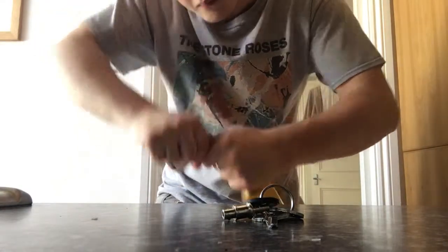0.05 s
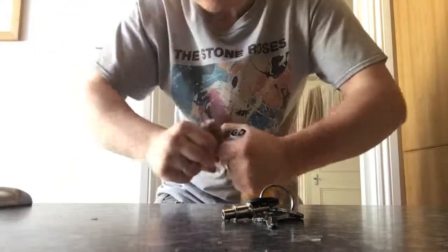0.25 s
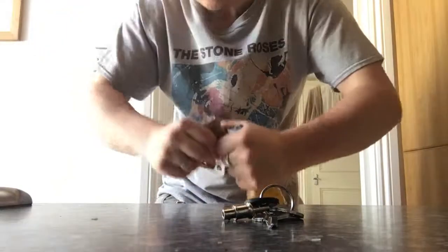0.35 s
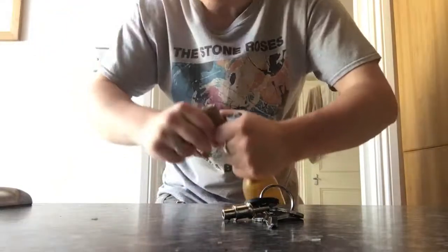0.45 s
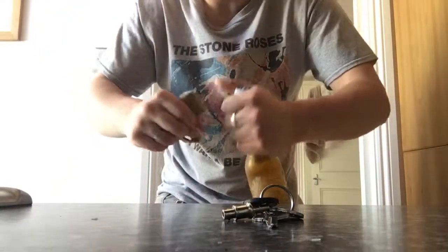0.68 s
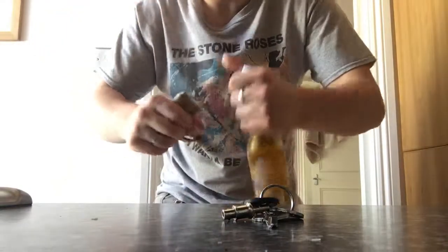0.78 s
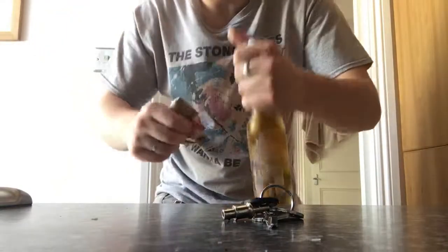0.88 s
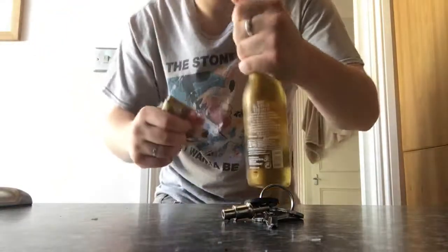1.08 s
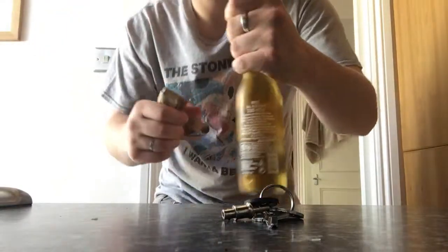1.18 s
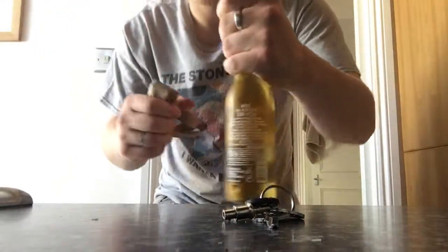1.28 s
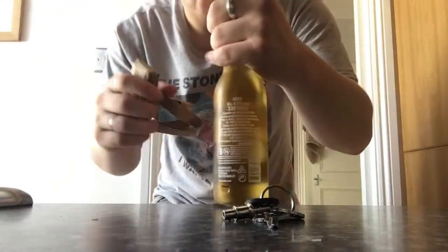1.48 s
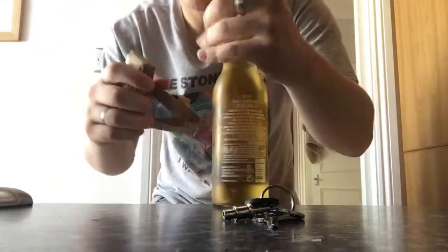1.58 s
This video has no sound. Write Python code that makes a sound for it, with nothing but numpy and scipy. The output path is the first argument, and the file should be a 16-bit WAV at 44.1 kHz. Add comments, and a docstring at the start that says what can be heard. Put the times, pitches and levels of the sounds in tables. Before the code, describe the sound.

Close to the microphone in a small room, a bottle pops open sharply after a tick and faint hand rustle. The loose cap ticks, the drink fizzes faintly, and the bottle is set down with a knock and short slide.

```python
"""A small kitchen, one microphone close to a glass bottle. Over room air and mains hum, hands rustle and
an opener bites a crown cap. Gas spurts, the cap cracks free and the air in the neck rings with a loud
hollow pop that returns from the walls. Light metal ticks and a faint fizz follow. At 1.1 s the background
drops away; then the bottle knocks on the countertop, rocks and slides a little."""
import sys
import numpy as np
from scipy import signal
from scipy.fft import rfft, irfft
from scipy.io import wavfile

SR = 44100
rng = np.random.default_rng(int(sys.argv[2]) if len(sys.argv) > 2 else 0)


def to_wav(s):
    """Save 16-bit WAV."""
    ch = np.atleast_2d(s).T  # columns
    pcm = np.round(np.clip(ch, -1, 1) * 32767)  # PCM
    wavfile.write(sys.argv[1], SR, pcm.astype(np.int16))


N = 72765
T = np.arange(N) / SR
NECK_S = .2381  # the air in the neck starts to ring
# glass touching the counter, in knock and slide: (frequency [Hz], level [dB])
CLINK_COLOUR = [(300, -2.5), (1700, 8.5), (3000, 2), (4800, -2), (5900, 2.5), (7500, -12.5), (11000, -9.5),
                (16000, -24)]


def undb(db):
    """Decibels to gain."""
    return 10 ** (np.asarray(db) / 20)


def unit(x):
    """Scale to rms 1."""
    return x / np.sqrt(np.mean(x ** 2))


def over_hz(points, hz):
    """Read (frequency [Hz], value) points on a log-frequency axis."""
    f, v = np.array(points, float).T
    return np.interp(np.log(np.maximum(hz, 1)), np.log(f), v)


def curve(points):
    """Gain from (time [s], level [dB]) points; silent before the first."""
    s, db = np.array(points, float).T
    return undb(np.interp(T, s, db)) * (T >= s[0])


def fade(start, decay):
    """Sudden start, exponential fall."""
    return (T >= start) * np.exp(-np.maximum(T - start, 0) / decay)


def noise(colour):
    """Noise of rms 1 with the given spectrum."""
    gain = undb(over_hz(colour, np.arange(N // 2 + 1) * SR / N))
    return unit(irfft(rfft(rng.standard_normal(N)) * gain, N))


def coloured(x, colour):
    """Causal filter of unit power with the given spectrum."""
    gain = unit(undb(over_hz(colour, np.arange(N + 1) * SR / (2 * N))))
    cepstrum = irfft(np.log(gain))[:N]
    minimum_phase = np.exp(2 * rfft(cepstrum, 2 * N) - cepstrum[0])
    return irfft(rfft(x, 2 * N) * minimum_phase)[:N]


def burst(colour, envelope):
    """Noise shaped by an envelope, then coloured."""
    return coloured(rng.standard_normal(N) * envelope, colour)


def resonate(x, hz, width, passes=1):
    """One resonance, gain 1 at its centre; each further pass narrows it."""
    for _ in range(passes):
        x = signal.lfilter(*signal.iirpeak(hz, hz / width, fs=SR), x)
    return x


def ring(modes, start):
    """Struck modes of alternating sign."""
    return sum((-1) ** k * undb(db) * np.sin(2 * np.pi * hz * (T - start))
               * fade(start, t60 / np.log(1000)) for k, (hz, db, t60) in enumerate(modes))


def kitchen():
    """Diffuse room response: half-octave bands of equal energy per hertz, each dying at its own rate."""
    # reverberation: (frequency [Hz], t60 [s])
    decay_times = [(100, 0.32), (400, .27), (900, 0.3), (2000, 0.32), (5000, 0.29), (9000, 0.19),
                   (15000, .2)]
    delay_s, build_s = .002, .003
    build = 1 - np.exp(-np.maximum(T - delay_s, 0) / build_s)
    hz, response = np.arange(N // 2 + 1) * SR / N, 0
    for low in 41 * np.sqrt(2) ** np.arange(18):
        inside = (hz >= low) & (hz < low * np.sqrt(2))
        band = irfft(rfft(rng.standard_normal(N)) * inside, N)
        band *= build * fade(0, over_hz(decay_times, low) / np.log(1000))
        response += band * np.sqrt(inside.mean() / np.sum(band ** 2))
    return response


def at_mic(x, room, room_db):
    """What reaches the microphone: direct sound plus reverberation."""
    return x + undb(room_db) * signal.fftconvolve(x, room)[:N]


def room_air():
    """The kitchen's room tone, mostly low rumble."""
    # spectrum of the air: (frequency [Hz], relative level [dB])
    air_colour = [(15, -27), (25, -4.5), (64, -2), (352, -10), (425, -8), (880, -17), (1220, -14.5),
                  (2730, -27.5), (6470, -28.5), (7820, -35.5), (15800, -49.5)]
    return undb(-55) * noise(air_colour)


def mains_hum():
    """Two low, steady tones from the mains."""
    # hum partials: (frequency [Hz], rms level [dB])
    partials = [(49, -60.5), (99, -64.5)]
    return sum(np.sqrt(2) * undb(db) * np.sin(2 * np.pi * (hz * T + rng.random())) for hz, db in partials)


def hands():
    """Hands rustle on the bottle."""
    # strength of the rustle: (time [s], level [dB])
    rustle_levels = [(0, -53), (.04, -58), (.2, -67.5), (.55, -57.5), (.65, -67), (.72, -98)]
    # its spectrum: (frequency [Hz], level [dB])
    rustle_colour = [(150, 3), (1300, 0.5), (3000, -5), (6500, -5), (10000, -18.5), (16000, -18.5)]
    return noise(rustle_colour) * curve(rustle_levels)


def metal_ticks(room):
    """Short gritty contacts of opener and cap; once the cap is loose they ring it."""
    # contacts: (time [s], level [dB], decay [s], dull above [Hz], room send [dB])
    contacts = [(0.0439, -25.5, 0.0021, 9000, 1.5), (0.2027, -49, 0.0037, 8000, 6),
                (0.2156, -40, .003, 4000, 16), (0.4299, -31, 0.0034, 2940, -1.5),
                (0.4436, -26, 0.0029, 1090, 2), (.566, -46, 0.0039, 2510, -7),
                (.575, -35, 0.0045, 2800, -6), (0.579, -34.5, 0.0072, 3214, -3)]
    # spectrum of a tick: (frequency [Hz], level [dB])
    tick_colour = [(200, -28.5), (700, -6), (1600, -6), (2200, 0.5), (3700, 1), (4800, -3), (7000, -0.5),
                   (12000, -5.5), (16000, -19)]
    # resonances of the loose cap: (frequency [Hz], width [Hz], gain [dB])
    cap_modes = [(654, 100, 12), (1350, 370, 10.5), (2020, 99, 10.5), (2780, 110, -1)]
    cap_free_s = .3
    direct = send = 0
    for s, db, decay, dull_hz, room_db in contacts:
        grit = rng.standard_normal(N) * fade(s, decay) * undb(db)
        contact = signal.lfilter(*signal.butter(1, dull_hz, fs=SR), grit)
        direct += contact
        send += undb(room_db) * contact
    ticks = coloured(direct + signal.fftconvolve(send, room)[:N], tick_colour)
    loose = ticks * (T > cap_free_s)
    return ticks + sum(undb(db) * resonate(loose, hz, width) for hz, width, db in cap_modes)


def gas_spurt(room):
    """Gas swells through the widening gap in the seal until the cap lets go."""
    # spectrum of the jet: (frequency [Hz], level [dB])
    gas_colour = [(200, -6), (900, -2.5), (1800, -10), (3000, -5.5), (5000, -3.5), (7000, -3),
                  (10000, -4.5), (15000, -7.5)]
    leak_s, peak_s, rise_s, fall_s = .222, .2368, .0066, .0012
    flow = (T >= leak_s) * np.exp(np.minimum((T - peak_s) / rise_s, (peak_s - T) / fall_s))
    return at_mic(undb(-20.5) * burst(gas_colour, flow), room, room_db=-3)


def cap_crack(room):
    """The cap snaps free of the rim."""
    # spectrum of the crack: (frequency [Hz], level [dB])
    crack_colour = [(300, -10), (1300, -1), (1900, -0.5), (2500, -1.5), (4000, -1), (4700, 1.5),
                    (5700, -9.5), (7000, 1.5), (9000, -9.5), (15000, -20)]
    crack = undb(-12) * burst(crack_colour, fade(start=.2366, decay=.0026))
    return at_mic(crack, room, room_db=0)


def jolt(room):
    """The bottle jolts in the hand with a low thump."""
    # modes of bottle and hand: (frequency [Hz], level [dB], t60 [s])
    thump_modes = [(87, -26, 0.11), (208.6, -16, 0.13), (265, -16.5, 0.11), (423, -16, .06),
                   (598.3, -14.5, 0.19)]
    return at_mic(ring(thump_modes, NECK_S), room, room_db=-1)


def neck_tone(start, attack_s):
    """A dozen strong cycles of the air in the neck, starting a little flat."""
    pitch_hz, flat_hz, settle_s = 798.6, 119.4, .004
    hold_s, release_s = .0105, .0045
    age = np.maximum(T - start, 0)
    cycles = pitch_hz * age - flat_hz * settle_s * (1 - np.exp(-age / settle_s))
    swing = np.minimum(age / attack_s, 1) * np.exp(-np.maximum(age - hold_s, 0) / release_s)
    return undb(2.5) * swing * np.sin(2 * np.pi * cycles)


def pop(room):
    """The neck pops hollowly and rings on faintly; the walls return the pop with a softer edge."""
    # lingering air in the neck: (frequency [Hz], level [dB], t60 [s])
    after_ring = [(770.5, -20, 0.49), (700.4, -8.5, .17), (649, -18, .12)]
    # wall echoes at the microphone: (delay [s], relative level [dB])
    walls = [(.0205, -15.5), (.074, -13.5), (.114, -23), (.128, -25)]
    direct = neck_tone(NECK_S, attack_s=.0019)
    echoes = sum(undb(db) * neck_tone(NECK_S + delay, attack_s=.005) for delay, db in walls)
    return at_mic(direct, room, room_db=-6.5) + echoes + ring(after_ring, NECK_S)


def fizz():
    """The drink fizzes faintly in the open neck."""
    # swell of the fizz: (time [s], relative level [dB])
    swell = [(.64, -18), (.73, 0.5), (.88, 0), (1.1, -4.5)]
    # bands of hiss: (frequency [Hz], width per pass [Hz], level [dB])
    bands = [(1264, 280, -63), (4200, 1000, -73.5), (6520, 600, -66.5), (13500, 5900, -80.5)]
    hiss = sum(undb(db) * unit(resonate(rng.standard_normal(N), hz, width, passes=2))
               for hz, width, db in bands)
    return hiss * curve(swell)


def knock(room):
    """The bottle lands and rocks: the counter thuds, the glass clinks and rings."""
    # landings of the base: (time [s], relative thud level [dB], relative clink level [dB])
    landings = [(1.3605, 0, -1), (1.3765, -11.5, -2), (1.413, -28, -20.5)]
    # countertop modes: (frequency [Hz], level [dB], t60 [s])
    counter_modes = [(139.4, -19, 0.071), (227, -11.5, 0.039), (395, -2.5, 0.034), (665, -2.5, 0.032),
                     (955, -6, 0.016), (1200, -6, 0.032), (1705, -19, 0.037)]
    # bottle glass modes: (frequency [Hz], level [dB], t60 [s])
    glass_modes = [(2134, -56.5, 0.58), (2643, -57, 0.14), (5770, -54, 0.13), (8667, -59, 0.31),
                   (10890, -64, 0.25), (11800, -65, 0.23)]
    low_cut_hz = 70
    push = fade(0, decay=.00056)  # the contact's force pulse dulls the thud
    counter = sum(undb(db) * ring(counter_modes, s) for s, db, _ in landings)
    thud = signal.fftconvolve(counter, push / push.sum())[:N]
    thud = signal.lfilter(*signal.butter(2, low_cut_hz, "high", fs=SR), thud)
    strikes = sum(undb(db) * fade(s, decay=.015) for s, _, db in landings)
    clink = undb(-41.5) * burst(CLINK_COLOUR, strikes)
    return at_mic(thud + clink, room, room_db=-7) + ring(glass_modes, landings[0][0])


def slide():
    """The base sticks and slips on the counter, which rumbles under a little glassy grit."""
    # rubbing strength: (time [s], level [dB])
    rubbing = [(1.47, -48), (1.522, -44), (1.56, -43.5), (1.585, -39.5), (1.62, -41), (1.65, -41.5)]
    # rubbed counter: (frequency [Hz], half-width per pass [Hz], relative gain [dB])
    rumble_modes = [(135, 35, -7), (268, 37, 3), (399, 24, 3), (643, 69, -18.5), (1130, 180, -26)]
    slips_per_s, grit_db = 1900, -30.5
    slips = (rng.random(N) < slips_per_s / SR) * rng.standard_normal(N)
    rumble = sum(undb(db) * resonate(slips, hz, 2 * half, passes=2) for hz, half, db in rumble_modes)
    return (unit(rumble) + undb(grit_db) * noise(CLINK_COLOUR)) * curve(rubbing)


def scene():
    """All sources at one microphone; before the knock the air drops and hum, hands and fizz cut out."""
    room = kitchen()
    drop_s, fade_s, air_drop_db = 1.103, .013, -14
    dropped = np.clip((T - drop_s) / fade_s, 0, 1)
    background = room_air() * undb(air_drop_db * dropped) + (mains_hum() + hands() + fizz()) * (1 - dropped)
    opening = metal_ticks(room) + gas_spurt(room) + cap_crack(room) + jolt(room) + pop(room)
    return (background + opening + knock(room) + slide())[None]


def record(dry):
    """Behind the microphone a limiter catches the pop and recovers slowly; the top is cut."""
    release_s, top_hz = .26, 15750
    over_db = 20 * np.log10(np.maximum(np.abs(dry), 1))  # excess over full scale
    recovery = np.exp(-T / release_s)
    reduction_db = np.maximum.accumulate(over_db / recovery, axis=-1) * recovery
    top_cut = signal.ellip(10, .1, 80, top_hz, fs=SR, output="sos")
    return signal.sosfilt(top_cut, dry * undb(-reduction_db))


dry = scene()
out = record(dry)
to_wav(out)
```